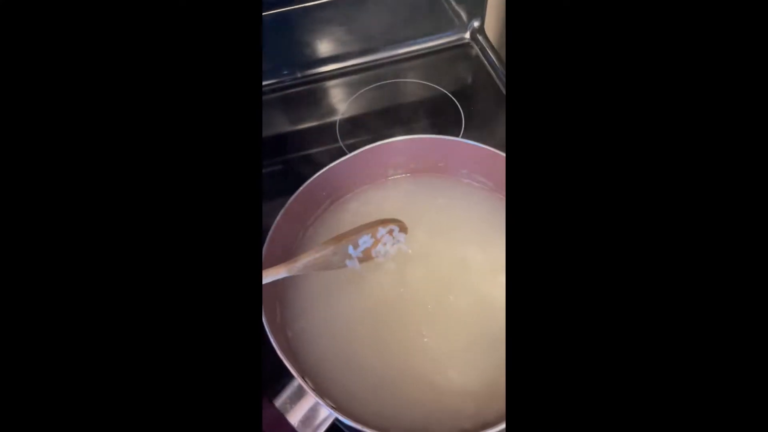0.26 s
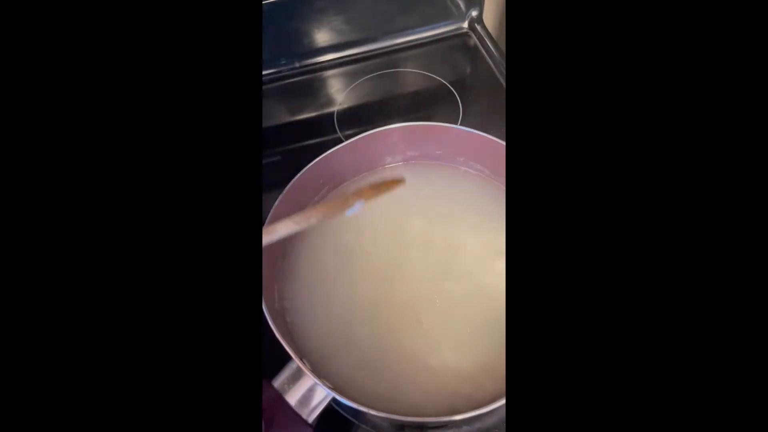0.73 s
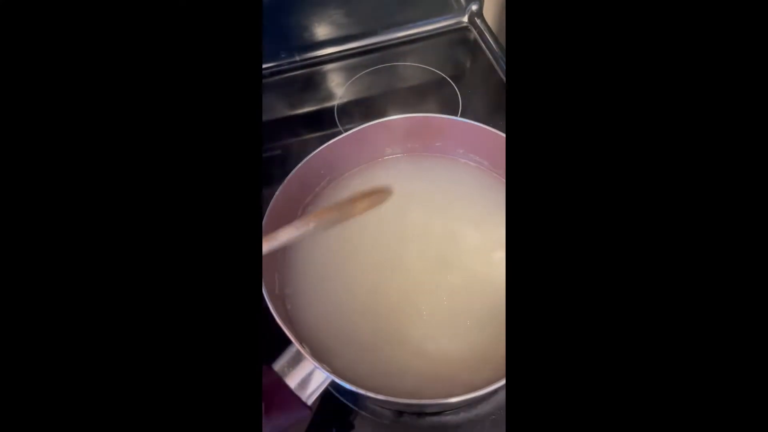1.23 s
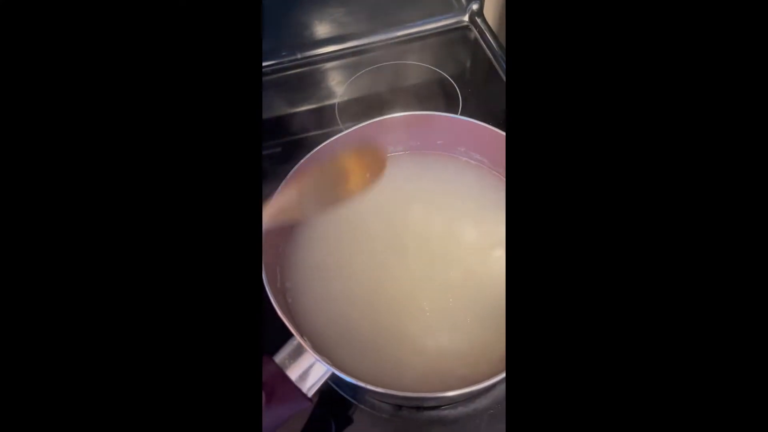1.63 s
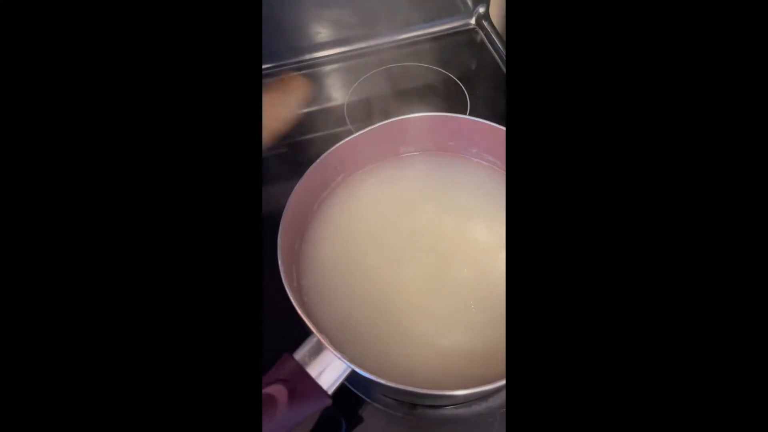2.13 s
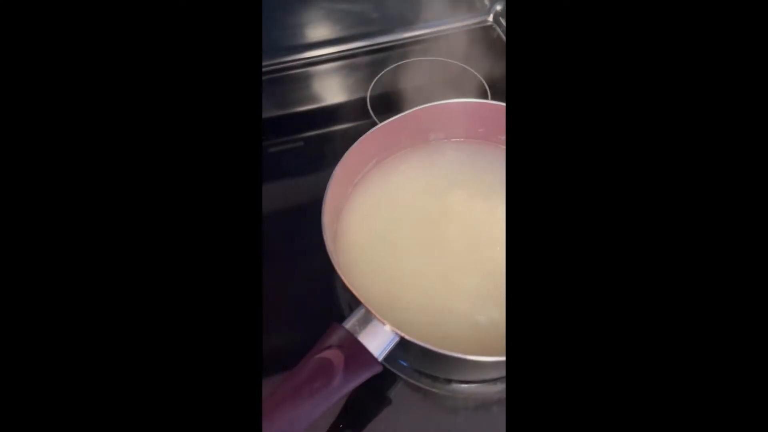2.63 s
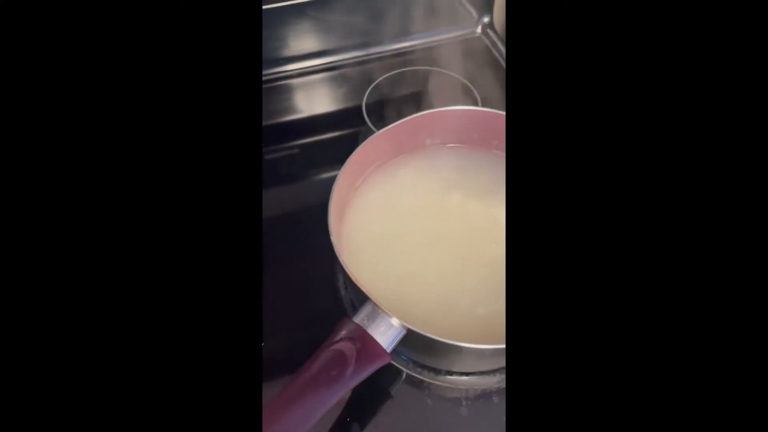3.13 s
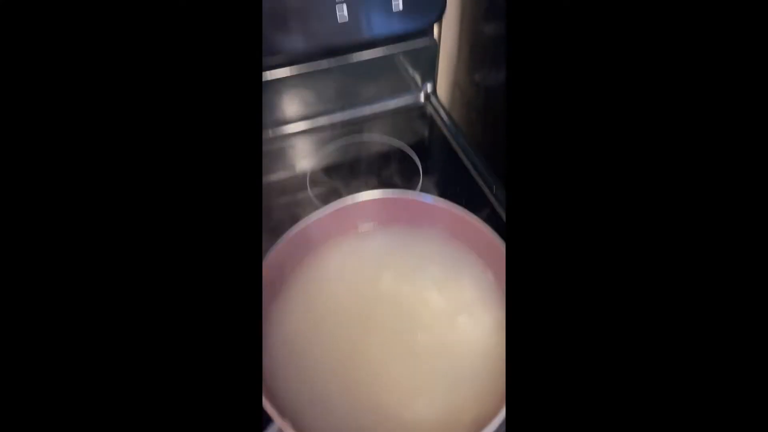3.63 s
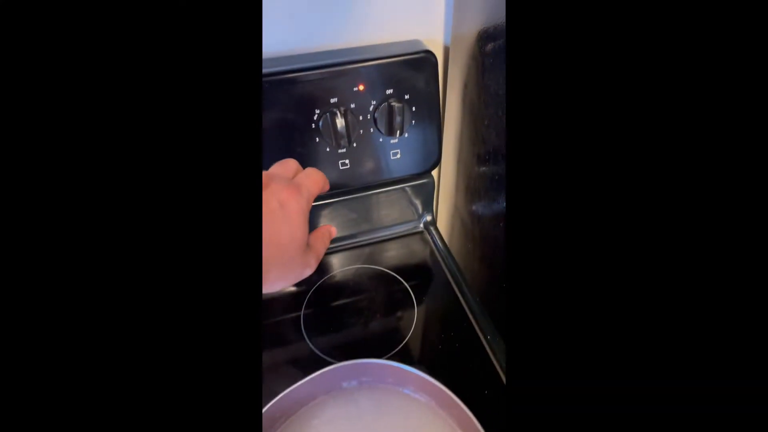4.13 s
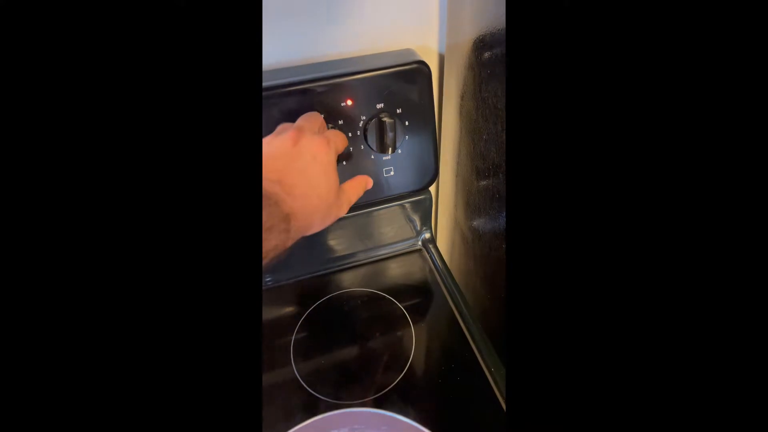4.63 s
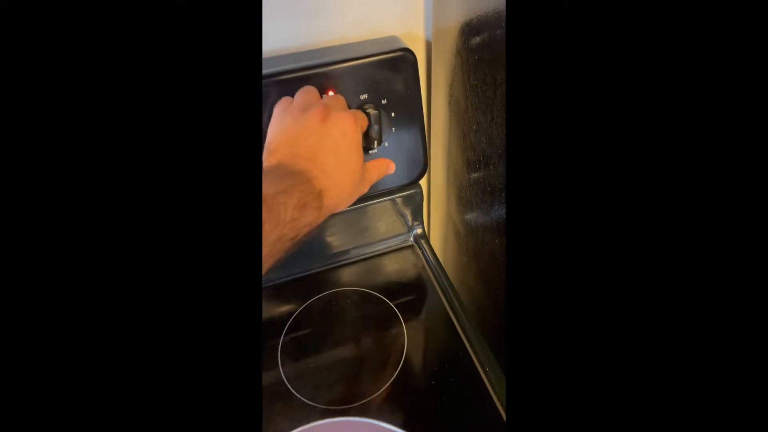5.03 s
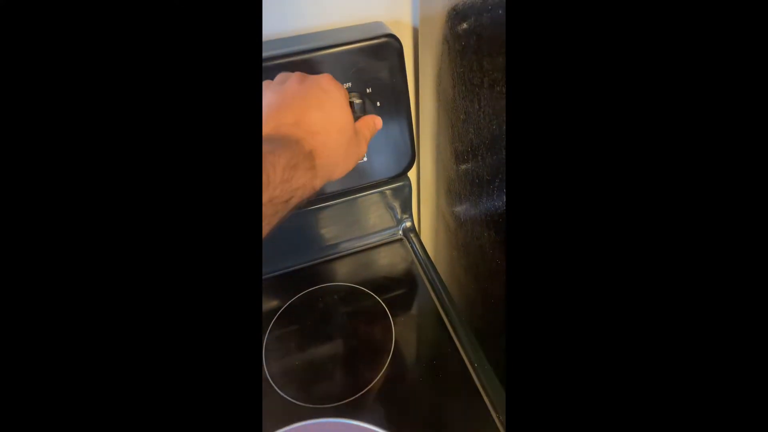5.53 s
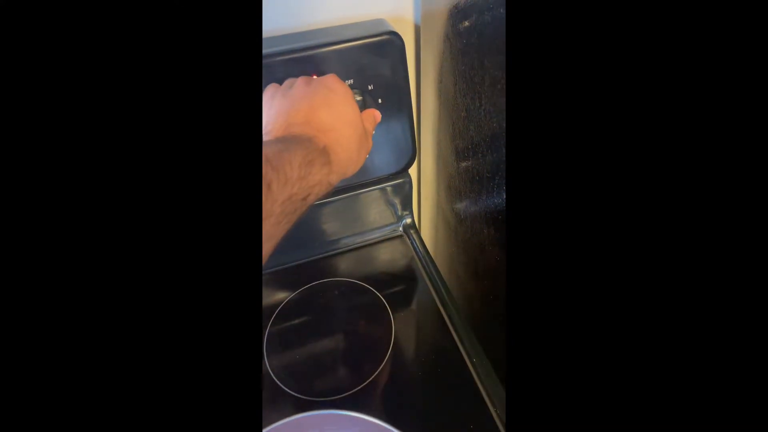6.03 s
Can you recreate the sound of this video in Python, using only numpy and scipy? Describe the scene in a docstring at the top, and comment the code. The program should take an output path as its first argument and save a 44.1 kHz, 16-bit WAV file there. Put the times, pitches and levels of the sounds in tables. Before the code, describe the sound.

Wet rice plops into a full saucepan, then a wooden spoon raps the rim five times, booming the stove; later faint knob clicks over kitchen rumble.

```python
"""Spoon knocked on a saucepan

Wet rice drops off a wooden spoon into a saucepan (noise splats, sine plops), then the spoon raps the rim
five times (shaped impulses). Each knock makes the glass-topped stove boom (decaying sines) and shudder (noise)
while the pan chatters on it. The spoon is put down and a stove knob clicks (noise bursts, panel modes);
underneath, the kitchen rumbles, hisses, throbs and flutters softly, and a deep sine drone climbs."""
import sys
import numpy as np
from scipy import signal
from scipy.fft import rfft, irfft
from scipy.io import wavfile

SR = 44100
rng = np.random.default_rng(int(sys.argv[2]) if len(sys.argv) > 2 else 0)


def wav_record(signal):
    """Record a signal, one row per channel, as 16-bit PCM in the file named by sys.argv[1]."""
    frames = np.transpose(np.atleast_2d(signal))
    bounded = np.clip(frames, -1, 1)
    # unit amplitude maps onto the largest positive 16-bit level
    quanta = np.round(bounded * 32767).astype(np.int16)
    wavfile.write(sys.argv[1], SR, quanta)


N = 276948

# spoon on the rim, and the pan it tips landing again:
# start_s [s], level_db [dB], extra_boom_db [dB], landing_tick_db [dB], landing_boom_db [dB]
RIM_KNOCKS = [(0.5867, -10.5, 4, -34, -19), (0.817, -8.5, -1.5, -40, -22), (1.031, -5, 1.5, -36, -26),
              (1.2264, -5, 2, -39.5, -23), (1.6421, -9, 4.5, -38, -12.5)]
# the loosely held spoon touches the rim again: start_s [s], level_db [dB]
RIM_REBOUNDS = [(1.0693, -16), (1.2482, -12), (1.2629, -24), (1.709, -27.5)]
# air pockets closed by the sinking lump of rice:
# start_s [s], pitch_hz [Hz], level_db [dB], t60_s [s], boom_db [dB]
RICE_PLOPS = [(0.199, 1297, -36, 0.073, -21.5), (0.198, 1420, -42.5, 0.013, -58),
              (0.272, 1283, -50, 0.026, -38)]


def knocks(rattling, level_db=12.5, treble_hz=3800, knock_treble_db=1.0, rebound_treble_db=-11.5):
    """Wood strikes the rim; the rebounds are duller than the knocks."""
    out = np.zeros(N)
    for rows, treble_db in (RIM_KNOCKS, knock_treble_db), (RIM_REBOUNDS, rebound_treble_db):
        for start_s, db, *_ in rows:
            bright = dispersed(clack(rattling), 2200, 2000, count=1)
            bright = dispersed(bright, 7000, 3000, count=5)
            dull = butter(bright, treble_hz, "low", order=1)
            blow = dull + from_db(treble_db) * (bright - dull)
            add(out, start_s, from_db(db + level_db) * blow)
    return out


def clack(rattling, scatter_db=-4.5, scatter_hz=4000):
    """One blow, sharp at the front; its treble can rattle round the rim for a few milliseconds."""
    # wood on the rim of the full, well damped pan: pitch_hz [Hz], level_db [dB]
    rim_colour = [(150, -24.5), (350, -11), (490, -15.5), (680, -4), (1000, -19), (1300, -5), (1850, 3.5),
                  (2300, -4.5), (2800, -6.5), (3300, -10), (3800, -17.5), (4600, -26.5), (5800, -13),
                  (7900, -13.5), (11500, -22.5), (15000, -44.5)]
    size = SR // 10
    t = np.arange(size) / SR
    magnitude = from_db(at_hz(rim_colour, np.fft.rfftfreq(size, 1 / SR))[0])
    cepstrum = irfft(np.log(magnitude), size)
    cepstrum[1:] *= 2 * (t[1:] < t[-1] / 2)      # minimum phase: nothing sounds before the contact
    blow = irfft(np.exp(rfft(cepstrum)), size)
    paths = rng.standard_normal(size) * (t < 0.003)
    paths = butter(paths / np.linalg.norm(paths), scatter_hz, "high")
    rattle = signal.fftconvolve(blow, paths)[:size]
    blow = blow + rattling * from_db(scatter_db) * rattle
    return blow / np.linalg.norm(blow)


def dispersed(x, hz, width_hz, count):
    """All-pass sections: bending waves near one pitch arrive late, so the blow builds over a few cycles."""
    r = np.exp(-np.pi * width_hz / SR)
    a = [1, -2 * r * np.cos(2 * np.pi * hz / SR), r * r]
    return signal.sosfilt([a[::-1] + a] * count, x + 1e-18)


def stove(knock_db=-3.0, rebound_db=-5.5, delay_s=0.003):
    """Every push on the pan reaches the cabinet a moment later and sets its modes booming."""
    # stove top and cabinet: pitch_hz [Hz], level_db [dB], t60_s [s]
    cabinet_modes = [(66, -20, 0.45), (92, -11, 0.21), (127, -15.5, 0.28), (150, -32, 0.3),
                     (168, -7.5, 0.16), (187, -8.5, 0.2), (264, -31, 0.2), (585, -30, 0.07),
                     (705, -30, 0.06)]
    boom, out = ringing(cabinet_modes), np.zeros(N)
    pushes = [(s, db + extra_db + knock_db) for s, db, extra_db, *_ in RIM_KNOCKS]
    pushes += [(s, db + rebound_db + knock_db) for s, db in RIM_REBOUNDS]
    for start_s, *_, db in pushes + landings() + RICE_PLOPS:
        add(out, start_s + delay_s, from_db(db) * boom)
    return out


def landings(rock_s=0.079, rock_at_db=-9, rock_power=0.4, settle_s=0.048, settle_tick_db=-8, settle_boom_db=-9):
    """The tipped pan drops back onto the glass twice: rows of start_s, tick_db, boom_db."""
    # between two knocks a light touch rocks the pan once more: start_s [s], tick_db [dB], boom_db [dB]
    light_touch = (1.46, -39, -21)
    first = []
    for start_s, db, _, tick_db, boom_db in RIM_KNOCKS:
        air_s = rock_s * from_db(db - rock_at_db) ** rock_power      # a harder knock tips the pan for longer
        first.append((start_s + air_s, tick_db, boom_db))
    first.append(light_touch)
    second = [(s + settle_s, db + settle_tick_db, boom_db + settle_boom_db) for s, db, boom_db in first]
    return first + second


def chatter(level_db=-4.0, t60=0.025, thud_db=-18.5, thud_t60=0.094):
    """The pan's base taps the glass as it settles: a tick and a dull thud."""
    # base on glass: pitch_hz [Hz], level_db [dB]
    tick_colour = [(200, 7), (350, 12), (800, 6), (1500, 1), (3000, 2.5), (5000, -4.5), (7500, 0),
                   (12000, -12), (16000, -26.5)]
    # dull knock of the glass top under the pan: pitch_hz [Hz], level_db [dB]
    thud_colour = [(100, -23.5), (230, -0.5), (340, 4), (500, -18.5), (850, -12.5), (1500, -30),
                   (4000, -49.5)]
    out = np.zeros(N)
    for start_s, db, boom_db in landings():
        add(out, start_s, from_db(db + level_db) * burst(tick_colour, t60))
        add(out, start_s, from_db(boom_db + thud_db) * burst(thud_colour, thud_t60))
    return out


def shudder(level_db=-24, t60=1.7):
    """Each knock feeds a low rumble in the cabinet that dies slowly."""
    # rumble of the cabinet, relative: pitch_hz [Hz], level_db [dB]
    shudder_colour = [(15, -35), (30, -18), (55, -2.5), (80, -1), (130, -2), (200, -13), (400, -34),
                      (1000, -70)]
    t = np.arange(N) / SR
    power = 0
    for start_s, db, *_ in RIM_KNOCKS:
        power = power + (t > start_s) * from_db(db - 60 * np.abs(t - start_s) / t60) ** 2
    envelope = butter(np.sqrt(power), 20, "low")
    noise = coloured(rng.standard_normal(N), shudder_colour)
    return from_db(level_db) * envelope * noise / noise.std()


def rice(level_db=0.0, t60=0.0287):
    """Bright wet splats of noise, then ringing bubbles as the lump goes under."""
    # wet rice slipping off and splashing: start_s [s], level_db [dB]
    splats = [(0.0383, -53.5), (0.1164, -35), (0.1421, -35.5), (0.173, -36.5), (0.189, -29.5),
              (0.1995, -36.5)]
    # wet splash: pitch_hz [Hz], level_db [dB]
    splat_colour = [(300, -20), (1200, -18), (2300, 0.5), (3500, -9), (7000, -4), (13000, 3), (16000, -29)]
    out = np.zeros(N)
    for start_s, db in splats:
        add(out, start_s, from_db(db + level_db) * burst(splat_colour, t60))
    for start_s, hz, db, ring_s, _ in RICE_PLOPS:
        add(out, start_s, ringing([(hz, db, ring_s)]))
    return out


def spoon_down(level_db=0.5, t60=0.023):
    """The spoon lands on its rest in two quick, dry touches."""
    # spoon laid down: start_s [s], level_db [dB]
    touches = [(2.8765, -35.5), (2.88, -48)]
    # the spoon and its rest: pitch_hz [Hz], level_db [dB]
    rest_colour = [(100, 7), (300, 1), (620, 4.5), (900, 0), (1300, 2), (2000, 2.5), (2700, -12),
                   (3300, 0.5), (4400, -8.5), (7000, -9.5), (12000, -6), (16000, -40)]
    out = np.zeros(N)
    for start_s, db in touches:
        add(out, start_s, from_db(db + level_db) * burst(rest_colour, t60))
    return out


def clicks(level_db=3.5, t60=0.014, body_hz=1500, panel_db=5.5):
    """Dry plastic clicks; heavier ones have more body and set the panel ringing harder."""
    # small handling ticks and knob detents: start_s [s], level_db [dB], extra_body_db [dB]
    detents = [(2.0391, -63, -23), (2.808, -65.5, -16), (4.579, -61.5, 7.5), (4.997, -59, 12.5),
               (5.1121, -50, 0.5), (5.118, -66.5, -17), (5.8159, -75.5, 18)]
    # dry plastic: pitch_hz [Hz], level_db [dB]
    click_colour = [(100, -7), (600, -1), (1200, 1), (2200, 7.5), (3400, -3), (4800, -0.5), (7000, 2),
                    (12000, 4.5), (16000, -23)]
    # knob and control panel: pitch_hz [Hz], level_db [dB], t60_s [s]
    panel_modes = [(137.6, -4, 0.15), (503, -16, 0.053), (1152, -34.5, 0.095), (2218, -20, 0.034),
                   (3934, -27, 0.04), (6050, -31, 0.06)]
    out = np.zeros(N)
    for start_s, db, body_db in detents:
        tick = burst(click_colour, t60)
        body = butter(tick, body_hz, "low", order=1)
        add(out, start_s, from_db(db + level_db) * (tick + (from_db(body_db) - 1) * body))
        add(out, start_s, from_db(db + body_db + panel_db) * ringing(panel_modes))
    return out


def drone(idle_hz=55, run_up_s=3, rise_hz_per_s=3.7, steady_db=-56.5, unsteady_db=-57.5, waver_hz=3.5):
    """A deep tone, as of a motor gathering speed: steady in pitch, then climbing; it wavers and swells."""
    # rms added at full swell (short swells fall before reaching it): start_s [s], length_s [s], level_db [dB]
    drone_swells = [(2.84, 0.2, -55.5), (3.22, 1.11, -44.5), (4.68, 0.39, -59.5), (5.45, 0.055, -47),
                    (5.8, 0.24, -50.5)]
    hz = idle_hz + rise_hz_per_s * np.maximum(np.arange(N) / SR - run_up_s, 0)
    phase = 2 * np.pi * np.cumsum(hz) / SR
    waver = butter(rng.standard_normal((2, N + SR)), waver_hz, "low")[:, SR:]
    waver = waver / waver.std()
    unsteady = waver[0] * np.sin(phase) + waver[1] * np.cos(phase)
    gain = from_db(steady_db) + swells(drone_swells, attack_s=0.14, release_s=0.034)
    return np.sqrt(2) * gain * np.sin(phase) + from_db(unsteady_db) * unsteady


def throb(first_s=0.074, period_s=0.15, uneven_db=1.0, growth_db=8.0):
    """A soft, even beat of decaying sines in the background, growing louder throughout."""
    # one stroke, as at the end of the scene: pitch_hz [Hz], level_db [dB], t60_s [s]
    stroke_modes = [(263.5, -52, 0.35), (294, -44, 0.096), (366, -45.5, 0.06), (410, -46, 0.013)]
    out, stroke = np.zeros(N), ringing(stroke_modes)
    for start_s in np.arange(first_s, N / SR, period_s):
        db = growth_db * (start_s * SR / N - 1) + uneven_db * rng.standard_normal()
        add(out, start_s, stroke * from_db(db))
    return out


def flutter(first_s=0.042, period_s=0.06664, depth_db=3.5):
    """A narrow band of noise that beats fifteen times a second, dipping by twice the depth."""
    # flutter at the top of each beat: pitch_hz [Hz], density_db [dB per Hz]
    flutter_colour = [(500, -125), (720, -102), (820, -88), (930, -103), (1300, -128), (4000, -170)]
    beat = np.cos(2 * np.pi * (np.arange(N) / SR - first_s) / period_s)
    noise = np.sqrt(SR / 2) * coloured(diffuse(N), flutter_colour)
    return noise * from_db(depth_db * (beat - 1.0))


def air(hiss_db=-2.5, hiss_growth_db=-1.5, rumble_growth_db=1.45):
    """Low room rumble that grows slowly under a faint hiss that fades slightly and swells now and then."""
    # room rumble midway through: pitch_hz [Hz], density_db [dB per Hz]
    rumble_colour = [(20, -87), (45, -79.5), (70, -75), (130, -76), (200, -86), (290, -80.5), (450, -93),
                     (600, -99), (810, -104), (1100, -109), (2000, -122), (16000, -140)]
    # fine hiss before its trim: pitch_hz [Hz], density_db [dB per Hz]
    hiss_colour = [(200, -125), (1000, -112), (1450, -113), (1800, -110), (2250, -106.5), (2700, -112),
                   (3200, -114), (4500, -118), (7000, -117), (12000, -116), (13200, -122), (15000, -140)]
    # added hiss at full swell, relative to the steady hiss: start_s [s], length_s [s], level_db [dB]
    hiss_swells = [(1.85, 0.15, 7.5), (3.55, 0.5, 2), (6.0, 0.3, 0.5)]
    progress = np.arange(N) / N - .5
    rumble = from_db(rumble_growth_db * progress) * coloured(diffuse(N), rumble_colour)
    hiss_gain = from_db(hiss_db + hiss_growth_db * progress)
    hiss_gain = hiss_gain * (1 + swells(hiss_swells, attack_s=0.22, release_s=0.13))
    return np.sqrt(SR / 2) * (rumble + hiss_gain * coloured(diffuse(N), hiss_colour))


def kitchen(x, gap_s=0.003, early_t60=0.095):
    """Quick scatter off the stove and wall, then the room's ring, dying band by band."""
    # room response: pitch_hz [Hz], early_db [dB], late_db [dB], late_t60_s [s]
    room_bands = [(59.5, -18.5, -7, 0.95), (168.4, -27, -9.5, 0.22), (360.7, 2.5, -9, 0.55),
                  (600, -5.5, -11, 0.55), (1110, -1.5, -9.5, 0.5), (1926, -8.5, -19, 0.62),
                  (4600, -2, -10.5, 0.68), (7160, -11, -19, 0.85), (14000, -7.5, -25, 0.31)]
    t, response = np.arange(SR) / SR, 0
    edges_hz = np.geomspace(40, 17000, 15)
    white = diffuse(SR), diffuse(SR)      # neighbouring bands use separate noises
    for k, band in enumerate(zip(edges_hz, edges_hz[1:])):
        early_db, late_db, late_t60 = at_hz(room_bands, np.sqrt(np.prod(band)))
        power = 0
        for db, t60 in (early_db, early_t60), (late_db, late_t60):
            rate = 2 * np.log(1000) / t60
            power = power + from_db(db) ** 2 * rate / SR * np.exp(-rate * np.maximum(t - gap_s, 0))
        response = response + butter(white[k % 2] * np.sqrt(power) * (t > gap_s), band, "band")
    return signal.fftconvolve(x[None], response, axes=1)[:, :N]


def from_db(db):
    """Decibels to gain."""
    return 10 ** (np.asarray(db) / 20)


def at_hz(points, hz):
    """Each column of a table, read on a log-frequency axis."""
    f, *columns = np.transpose(points)
    return [np.interp(np.log(np.maximum(hz, 1)), np.log(f), c) for c in columns]


def coloured(x, spectrum):
    """Gives a noise a spectrum."""
    size = x.shape[-1]
    return irfft(rfft(x) * from_db(at_hz(spectrum, np.fft.rfftfreq(size, 1 / SR))[0]), size)


def diffuse(size):
    """White stereo noise whose sides are alike in the lows and top and unlike between."""
    # left-right likeness of the background noise and room: pitch_hz [Hz], correlation [-1 to 1]
    likeness = [(60, .999), (150, 1), (300, .88), (700, .3), (1400, 0.15), (3000, 0.17), (5000, 0.13),
                (8000, 1), (11000, 0.98)]
    alike = np.clip(at_hz(likeness, np.fft.rfftfreq(size, 1 / SR))[0], -1, 1)
    mid, side = rfft(rng.standard_normal((2, size)))
    return irfft(np.sqrt((1 + alike) / 2) * mid + np.sqrt((1 - alike) / 2) * side * [[1], [-1]], size)


def butter(x, hz, kind, order=2):
    """Causal low-, high- or band-pass."""
    return signal.sosfilt(signal.butter(order, hz, kind, fs=SR, output="sos"), x + 1e-18)


def add(out, start_s, sound):
    """Mixes a sound in at a time."""
    start = max(round(start_s * SR), 0)
    out[start:start + len(sound)] += sound[:max(N - start, 0)]


def ringing(modes):
    """One second of decaying sines, neighbours in opposite phase."""
    t = np.arange(SR) / SR
    out = 0
    for k, (hz, db, t60) in enumerate(modes):
        out = out + (-1) ** k * from_db(db - 60 * t / t60) * np.sin(2 * np.pi * hz * t)
    return out


def burst(colour, t60):
    """A brief decaying crackle of contact that starts at rms 1."""
    t = np.arange(SR // 10) / SR
    noise = coloured(rng.standard_normal(len(t)), colour)
    return noise / noise.std() * from_db(-60 * t / t60)


def swells(rows, attack_s, release_s):
    """Gain that rises, holds and falls once for each row."""
    t = np.arange(N) / SR
    gain = 0
    for start_s, length_s, db in rows:
        rise = np.clip((t - start_s) / attack_s, 0, 1)
        fall = np.clip(1 - (t - start_s - length_s) / release_s, 0, 1)
        gain = gain + from_db(db) * rise * fall
    return gain


def trailing(right):
    """Sound reaches the right side a little later: a phase lag that depends on frequency."""
    # lag of right behind left: pitch_hz [Hz], phase_rad [rad]
    side_phase = [(20, 0), (700, 0.2), (1700, 0.3), (2400, 0.8), (4500, 1.25), (6000, 0.85), (8000, 1.95),
                  (10200, 3.1), (12500, 4.2), (16000, 5.4)]
    phase, = at_hz(side_phase, np.fft.rfftfreq(N, 1 / SR))
    return irfft(rfft(right) * np.exp(-1j * phase), N)


def panel_echo(blows, cut_hz=5600, gain=0.5):
    """The stove's narrow back panel reflects only short waves."""
    return gain * butter(blows, cut_hz, "high", order=1)


def scene(rice_wet_db=-2.0, click_wet_db=8.5, knock_wet_db=0.5, echo_s=0.00213):
    """Pan and rice are close by, the clicks and the laid-down spoon further off in the room."""
    blows, splash = knocks(rattling=True), rice()
    ticks, body = clicks() + spoon_down(), stove() + chatter()
    # the room hears the rim from all sides, which evens out its rattle
    spread = from_db(knock_wet_db) * knocks(rattling=False)
    room = kitchen(spread + body + from_db(rice_wet_db) * splash + from_db(click_wet_db) * ticks)
    pan = blows + body
    add(pan, echo_s, panel_echo(blows))
    close = pan + splash + ticks
    background = throb() + flutter() + shudder() + drone() + air()
    left, right = close + room + background
    return np.array([left, trailing(right)])


def record(dry, cutoff_hz=16000):
    """The top is cut steeply by an elliptic low-pass."""
    return signal.sosfilt(signal.ellip(10, .1, 80, cutoff_hz, fs=SR, output="sos"), dry)


dry = scene()
out = record(dry)
wav_record(out)
```